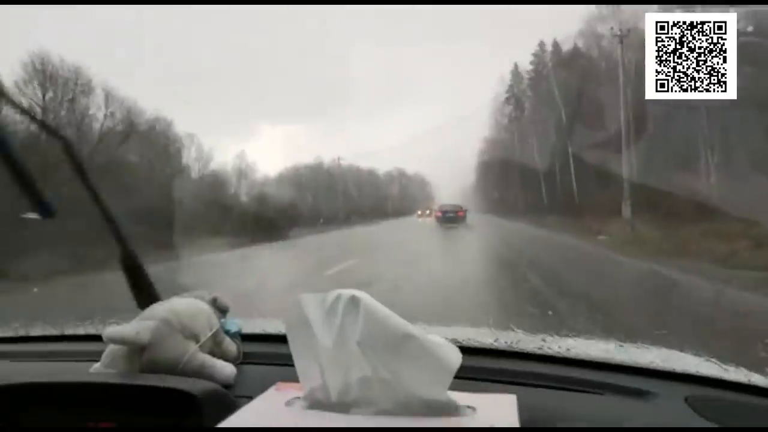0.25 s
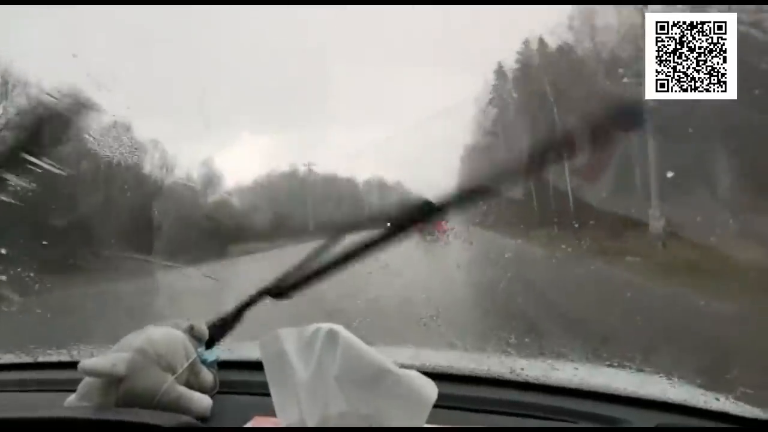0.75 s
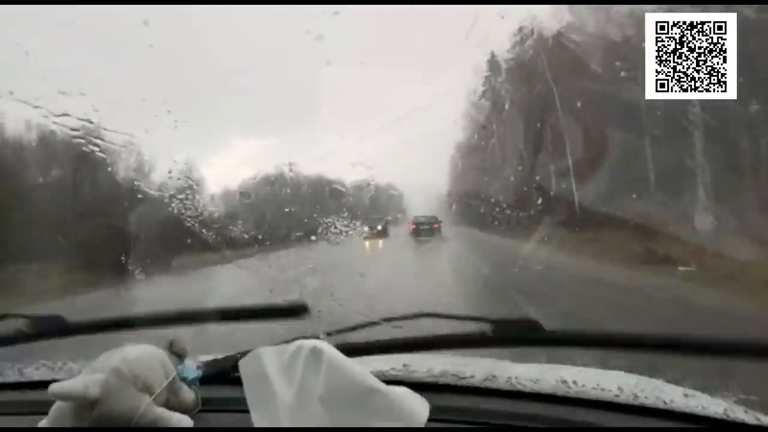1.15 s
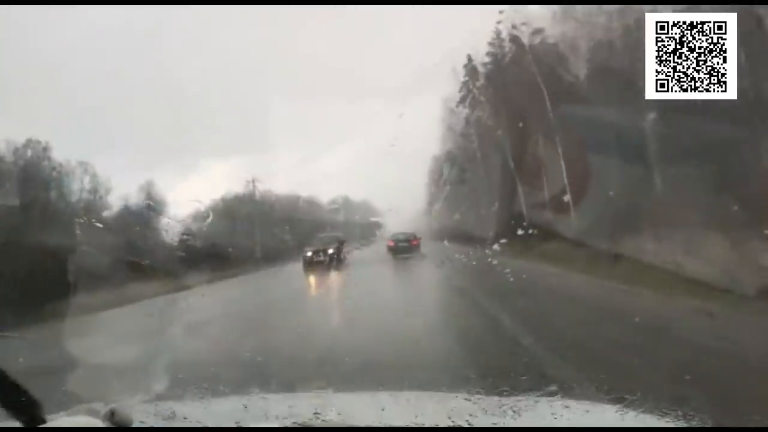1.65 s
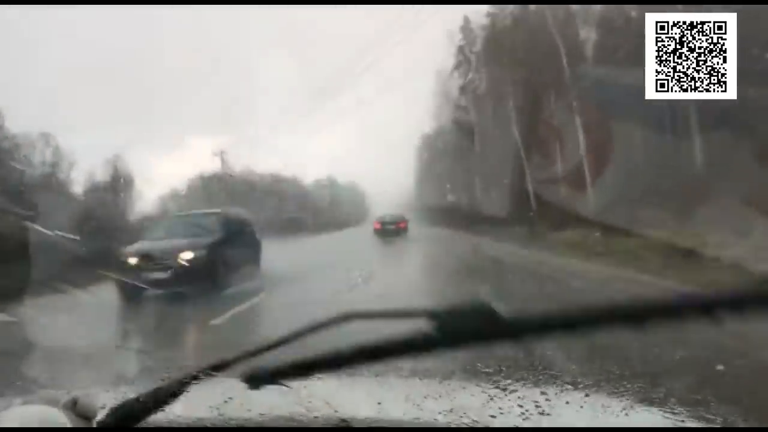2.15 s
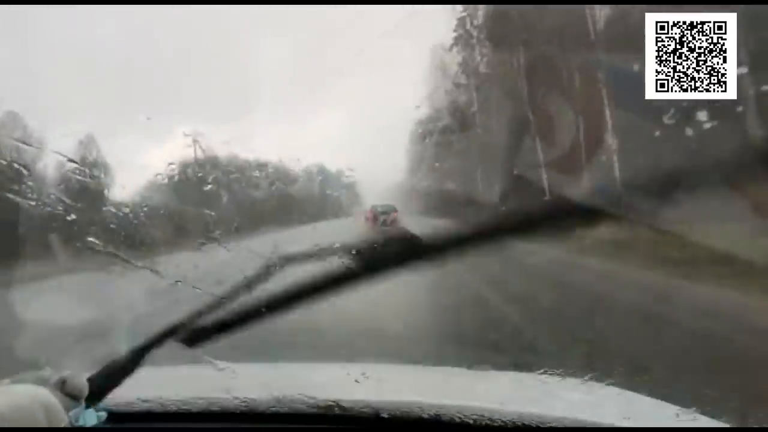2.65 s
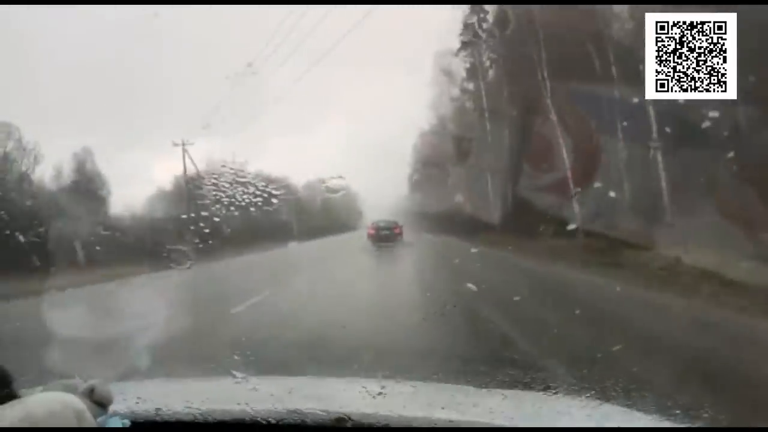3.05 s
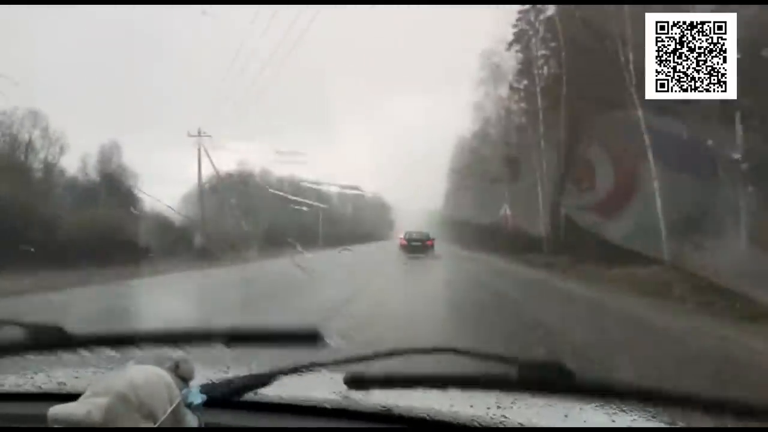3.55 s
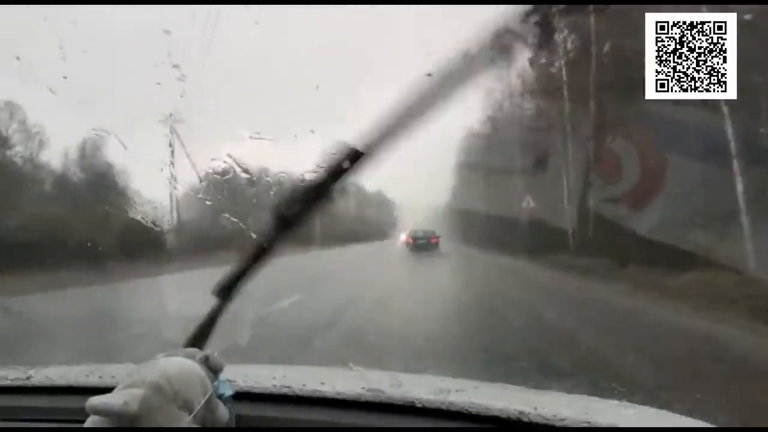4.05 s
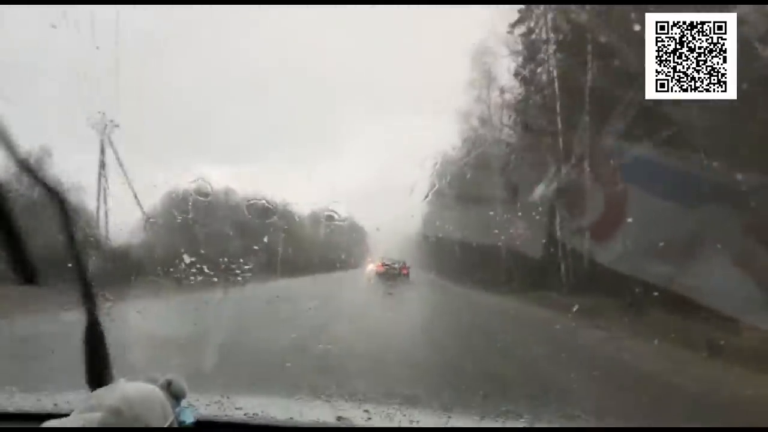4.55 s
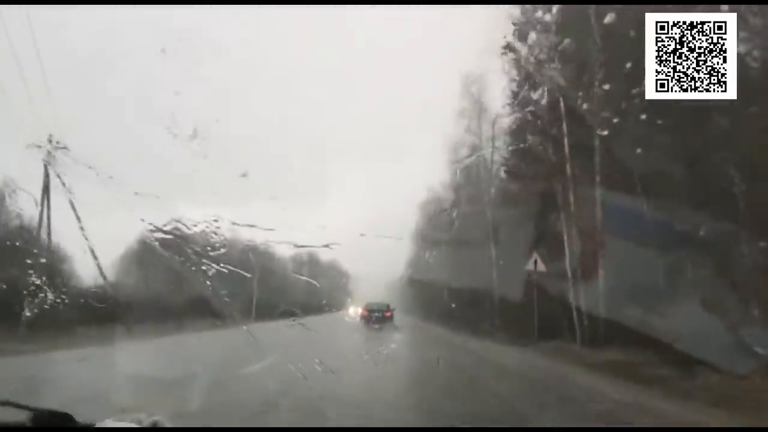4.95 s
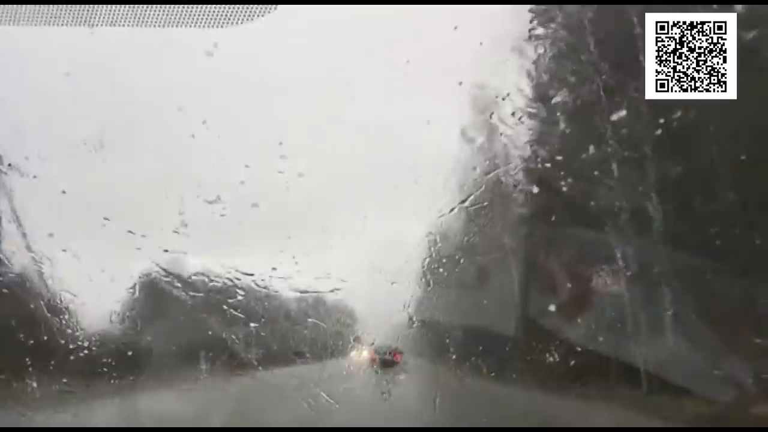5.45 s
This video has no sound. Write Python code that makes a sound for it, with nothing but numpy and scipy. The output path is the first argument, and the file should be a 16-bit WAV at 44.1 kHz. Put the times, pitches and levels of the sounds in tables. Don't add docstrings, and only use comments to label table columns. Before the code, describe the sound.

Hail and heavy rain clatter on the roof and windscreen of a slowing car, over low tyre roar, engine hum and cabin boom.

```python
import sys
import numpy as np
from scipy import signal
from scipy.fft import rfft, irfft, next_fast_len
from scipy.io import wavfile
from scipy.ndimage import map_coordinates

SR = 44100
rng = np.random.default_rng(int(sys.argv[2]) if len(sys.argv) > 2 else 0)


def ratio(d):
    e = np.asarray(d, float) / 20
    return 10 ** e


def transcribe(u):
    v = np.clip(np.atleast_2d(u).T, -1, 1)
    q = np.round(v * 32767).astype(np.int16)
    wavfile.write(sys.argv[1], SR, q)


N = 251811


def unit(x):
    return x / np.sqrt(np.mean(x ** 2) + 1e-20)


def along(points, hz):
    f, v = np.transpose(points)
    return np.interp(np.log(hz + 1), np.log(f + 1), v)


def curves(rows):
    s, *columns = np.transpose(rows)
    return [np.interp(np.arange(N) / SR, s, column) for column in columns]


def wobble(rate):
    knots = rng.standard_normal(int(N * rate / SR) + 4)
    return map_coordinates(knots, [np.arange(N) * rate / SR])


def filtered(x, response):
    m = next_fast_len(N + 8192)
    return irfft(rfft(x, m) * response(np.fft.rfftfreq(m, 1 / SR)), m)[..., :N]


# frequency in Hz, left-right likeness 0-1.
LIKENESS = [(60, .995), (200, .95), (400, .82), (600, .38), (780, .58), (1200, .08), (1700, .5),
            (2200, .28), (3500, .25), (6000, .07)]
# frequency in Hz, lag in radians.
LEFT_LAG = [(0, 0), (780, .45), (1100, .3), (1500, 3.6), (2850, 9.2), (4200, 14.8), (8000, 31)]


def field():
    def mid_side(hz):
        turn = np.arccos(np.clip(along(LIKENESS, hz), 0, 1)) / 2
        return np.array([np.cos(turn), np.sin(turn)])

    def lag(hz):
        return np.exp(1j * np.outer([-1, 1], np.interp(hz, *np.transpose(LEFT_LAG)) / 2))

    mid, side = filtered(rng.standard_normal((2, N)), mid_side)
    return filtered(np.array([mid + side, mid - side]), lag)


def rush(spectrum):
    return unit(filtered(field(), lambda hz: ratio(along(spectrum, hz))))


# time in seconds, level in dB.
SHAKE_LEVEL = [(0, -24), (.76, -20), (1.85, -16), (2.2, -20.5), (2.8, -18), (3.25, -11.5), (3.4, -22.5),
               (3.55, -17.5), (4.2, -23), (4.69, -17.5), (5.71, -17.5)]
# frequency in Hz, density in dB per Hz.
TYRE_COLOUR = [(120, -30.5), (200, -2), (377, 0.5), (607, -2), (807, -4), (1900, -17.5), (2500, -28),
               (3250, -37), (5500, -120)]
HUM_COLOUR = [(35, -30.5), (60, -1.5), (194, -12), (295, -18.5), (377, -19), (450, -21.5), (580, -34.5),
              (990, -120)]
SHAKE_COLOUR = [(8, -30), (15, -3), (30, 0), (38, -3), (46, -12), (70, -16), (100, -40), (150, -120)]


def road():
    roar_db = -34 + 0.1 * np.arange(N) / SR + 3 * wobble(3.17) + 0.92 * wobble(12)
    roar = ratio(roar_db) * rush(TYRE_COLOUR)
    hum = ratio(-23 + 1.1 * wobble(10)) * rush(HUM_COLOUR)
    shake_db, = curves(SHAKE_LEVEL)
    swing = unit(np.tanh(.9 * rush(SHAKE_COLOUR)))
    shake = ratio(shake_db + 1.1 * wobble(4.7)) * swing
    return roar + hum + shake


def tones(table, orders, unsteady_db, waver):
    hz, db = curves(table)
    turn, t = 2 * np.pi * np.cumsum(hz) / SR, np.arange(N) / SR
    total = 0
    for multiple, over_db, fade_db in orders:
        level = ratio(db + over_db + fade_db * t + unsteady_db * wobble(9))
        drift = waver * multiple ** 1.6 * wobble(9)
        total = total + level * np.sin(multiple * turn + drift)
    return np.sqrt(2) * total


# time in seconds, firing rate in Hz, load in dB.
ENGINE_GLIDE = [(0, 85.2, -33), (1.2, 84.66, -30), (1.7, 83.02, -26.5), (3, 77.24, -23), (3.75, 74.96, -24),
                (4.1, 73.43, -34.5), (5.71, 71.87, -42.5)]
# multiple of the firing rate, dB over the load, drift in dB per second.
ENGINE_MULTIPLES = [(1, -2, 0.5), (1.5, 4, -4), (2, 2.5, -5.5), (2.85, -10.5, -0.43)]


def engine():
    return tones(ENGINE_GLIDE, ENGINE_MULTIPLES, unsteady_db=1.5, waver=.25)


# time in seconds, frequency in Hz, level in dB.
BOOM_GLIDE = [(0, 52.77, -29.5), (1, 52.66, -28.5), (2, 53.1, -31), (2.55, 54.94, -22),
              (2.85, 55.07, -29.5), (3.5, 54.92, -26), (4.05, 55.08, -25.5), (4.3, 54.18, -16),
              (4.8, 54, -20.5), (5.71, 54.1, -19)]
# multiple of the boom, dB over the boom, drift in dB per second.
BOOM_MULTIPLES = [(1, 0.5, 0.5), (1.82, -21.5, 2), (3, -19.5, 0.03)]


def boom():
    return tones(BOOM_GLIDE, BOOM_MULTIPLES, unsteady_db=1, waver=.1)


def dying(energy, t60):
    return signal.lfilter([1], [1, -ratio(-120 / (max(t60, 1e-3) * SR))], energy)


# time in seconds, peak in dB, dull thud in dB.
LONE_STONES = [(.002, -22.5, 3), (0.079, -21.5, 3), (0.11, -31, -11), (.173, -20, 3), (.206, -22.5, 0.5),
               (.252, -25.5, -2), (0.279, -19, 2), (.3415, -37, -7.5), (2.762, -21.5, 3),
               (2.786, -18.5, -5.5), (2.819, -16, -1.5), (2.8798, -23.5, 1.5), (2.9328, -23, -5),
               (2.9705, -15.5, 0), (3.0129, -18, -7), (3.076, -21.5, -3), (3.923, -30, -11.5),
               (3.9567, -27, 0.5), (.31, -23.5, -1), (2.4103, -18.5, -1), (3.1084, -20, -4.5),
               (4.255, -23, -8.5)]
# time in seconds, peak in dB, dull thud in dB.
LARGE_STONES = [(0.398, -23, -8.5), (0.447, -21, 0), (0.5302, -22.5, -6), (0.62, -20.5, 10),
                (0.7157, -15.5, -4.5), (0.788, -18.5, -11.5), (1.4347, -22, 3.5), (.9398, -16, 2.5),
                (1.0574, -16, -5), (1.0884, -23, 2.5), (1.2157, -19.5, 3), (1.6035, -18, -8.5),
                (1.7815, -18.5, -1), (2.024, -18, 3.5), (2.1392, -27, -13), (2.298, -17.5, -6.5),
                (2.5638, -20, -13.5), (2.6564, -20, 4.5), (3.1589, -20.5, -8), (3.296, -20.5, -1.5),
                (3.4043, -20, 0.5), (3.638, -21, 3.5), (4.0317, -24, 2), (4.898, -18.5, -5.5),
                (4.2975, -22, 9), (4.343, -23, -6.5), (4.6047, -17.5, 0), (4.693, -18.5, -0.5),
                (5.15, -19.5, -0.5), (5.5195, -24.5, 8.5)]
# time in seconds, level in dB.
SHOWER_LEVEL = [(0, -46.5), (.15, -50), (.2, -38), (.59, -30), (.78, -33), (1.08, -29), (1.26, -34),
                (1.86, -30), (2.29, -35), (2.5, -32), (2.89, -37), (3.16, -29), (3.44, -33.5), (3.82, -33),
                (4.23, -29.5), (5.02, -34), (5.39, -32), (5.71, -30.5)]
# start in seconds, end in
# seconds.
MIDDLING_LULLS = [(0, 0.33), (.47, 0.55), (1.5, 1.51), (2.22, 1.97), (2.72, 3.4), (3.87, 4.54)]
# start in seconds, end in seconds.
SMALL_GAPS = [(1.56, 1.57), (2.265, 1.97), (2.895, 2.95), (3.04, 3.073), (3.885, 3.84)]


def stones():
    shower_db, = curves(SHOWER_LEVEL)

    slots = 175
    s = (np.arange(slots) + rng.random(slots)) / slots * (N - 1) / SR
    size, thud = rng.standard_normal((2, slots))
    silent = np.any([(s > a) & (s < b) for a, b in np.vstack([MIDDLING_LULLS, SMALL_GAPS])], axis=0)
    swing_db = shower_db[(s * SR).astype(int)] - shower_db.mean()
    db = -24 + .1 * swing_db + 2 * np.clip(size, -1.5, 1)
    thud_db = 4.5 * np.clip(thud, -2, 1) + 0.5
    middling = np.array([s, np.where(silent, -90, db), thud_db])

    s, db, thud_db = np.hstack([np.transpose(LONE_STONES), np.transpose(LARGE_STONES), middling])
    pan_db = 3 - s + 5.5 * rng.standard_normal(len(s))
    big = np.array([s * SR, db - 7.5, thud_db - 0.5, pan_db])

    early, late = rng.random((2, len(s)))
    before = big + [[-.002 * SR], [-6], [0], [0]] - np.outer([.008 * SR, 0, 0, 0], early)
    after = big + [[.003 * SR], [-2], [0], [0]] + np.outer([.014 * SR, 0, 0, 0], late)
    before[1, :len(LONE_STONES)] = -90

    count = 2200
    at = rng.random(count) * (N - 1)
    small_db = shower_db[at.astype(int)] - 7 - 3 * np.log(rng.random(count) + .04)
    in_gap = np.any([(at > (a - .02) * SR) & (at < b * SR) for a, b in SMALL_GAPS], axis=0)
    thud, pan = rng.standard_normal((2, count))
    small = np.array([at, small_db - 8.5 * in_gap, 2.5 * thud, 1.5 * pan])
    return np.hstack([big, before, after, small])


# band centre in Hz, t60 in seconds, share of the thud (1 all, below 0 reversed), crack in
# dB.
CABIN_BANDS = [
    (753, 0.2, 1, 0.5),
    (1780, 0.12, 0.4, 5.5),
    (3290, 0.064, 0, 6.5),
    (6460, 0.057, -.2, 5.5),
]
# frequency in Hz, density in dB per Hz.
PANEL_COLOUR = [(210, -9.5), (350, -2), (383, -2.5), (459, -10), (571, -9), (798, -7), (993, -9),
                (1990, -9), (2510, -16.5), (3550, -15), (4660, -25), (6110, -21), (7220, -16.5),
                (7600, -20), (9880, -43.5), (16700, -120)]


def hail():
    at, db, thud_db, pan_db = stones()
    at = np.clip(at, 0, N - 1).astype(int)
    noise, out = field(), 0
    centres = [row[0] for row in CABIN_BANDS]
    sharp = ratio(4 * np.clip(rng.standard_normal(len(at)), -2, 1.5))
    for k, (_, t60, share, crack_db) in enumerate(CABIN_BANDS):
        spot_db = 1.97 * rng.standard_normal((2, len(at)))
        power = ratio(2 * (db + share * thud_db + np.outer([.5, -.5], pan_db) + spot_db))
        energy = np.array([np.bincount(at, p, N) for p in power])
        cracks = np.array([np.bincount(at, p * sharp, N) for p in power])
        ring = np.abs(dying(energy, t60) - .9 * dying(energy, .035))
        shape = np.sqrt(ring + ratio(crack_db) * dying(cracks, 0.013))
        band = np.column_stack([centres, np.eye(len(centres))[k]])
        out = out + filtered(shape * noise, lambda hz: np.sqrt(along(band, hz)))
    treble = filtered(noise, lambda hz: ratio(along(PANEL_COLOUR, hz)) * (hz > 2500))
    return ratio(-5.5) * filtered(out, lambda hz: ratio(along(PANEL_COLOUR, hz))) / np.std(treble)


def bursts(events, t60):
    s, db = np.transpose(events)
    energy = np.bincount((s * SR).astype(int), ratio(2 * db), N)
    return np.sqrt(dying(energy, t60)) * rng.standard_normal((2, N))


# time in seconds, peak in dB.
ICE_TICKS = [(.382, -22), (.459, -21), (.5307, -20), (.6195, -24), (.79, -24), (.831, -19), (1.093, -18.5),
             (1.1253, -26), (1.3586, -34), (1.6067, -29), (1.9584, -23.5), (2.2583, -22), (2.4119, -13),
             (2.765, -21), (2.8818, -25), (2.9325, -17), (3.158, -23), (3.2745, -22.5), (3.2979, -13),
             (3.4057, -18), (3.8911, -26), (3.9557, -19), (4.031, -16.5), (4.132, -16), (4.2545, -19),
             (4.345, -15), (4.562, -25), (4.787, -27), (5.1791, -18), (5.2101, -18)]


def ticks():
    when, size = rng.random((2, 60))
    faint = np.column_stack([0.23 + when * (N / SR - .4), -35 + 6 * (size - .5)])
    clicks = bursts(np.vstack([ICE_TICKS, faint]), 0.0098)
    return ratio(4) * filtered(clicks, lambda hz: np.clip((hz - 2500) / 4500, 0, 1))


# time in seconds, peak in dB.
ROOF_LUMPS = [(0.5786, -17.5), (0.6394, -18.5), (1.5958, -17), (2.2962, -17), (2.3146, -4), (2.437, -11),
              (2.6324, -15), (2.6633, -13.5), (3.1637, -17), (5.4186, -14.5)]
# frequency in Hz, density in dB per Hz.
SPRAY_COLOUR = [(500, -31.5), (900, -14.5), (1400, 6), (2100, -5), (3500, -16), (6000, -120)]


def lumps():
    return ratio(1.5) * filtered(bursts(ROOF_LUMPS, 0.069), lambda hz: ratio(along(SPRAY_COLOUR, hz)))


# time in seconds, level in dB.
PASSING_LEVEL = [
    (1.9, -55),
    (2.2, -39.5),
    (2.36, -27.5),
    (2.5, -31.5),
    (2.8, -44.5),
]


def passing():
    near_db = np.interp(np.arange(N) / SR, *np.transpose(PASSING_LEVEL), left=-90, right=-90)
    return ratio(near_db + 1.1 * wobble(25)) * rush(SPRAY_COLOUR)


def scene():
    return road() + engine() + boom() + hail() + ticks() + lumps() + passing()


def low_pass(x):
    return signal.sosfilt(signal.butter(12, 9060, fs=SR, output="sos"), x)


# frequency in Hz, left over right in dB.
MICROPHONE_TILT = [(60, 0.5), (230, 2), (570, -0.5), (890, 0), (1400, 7.5), (2200, 10.5), (3400, 11),
                   (4200, -1.5), (4700, -4.5), (6000, -3), (7400, -12), (8200, -16.5), (9000, -6.5)]


def record(dry):
    def microphones(hz):
        tilt = ratio(np.outer([.5, -.5], along(MICROPHONE_TILT, hz)))
        slope_db = -.075 * np.clip(hz - 7785, 0, None)
        leak_db = -60 - .004 * (hz - 9000)
        return tilt * ratio(np.maximum(slope_db, leak_db))

    x = filtered(dry, microphones)
    mix = x / (1 + np.abs(x / .9) ** 6) ** (1 / 6)
    return low_pass(mix)


dry = scene()
out = record(dry)
transcribe(out)
```